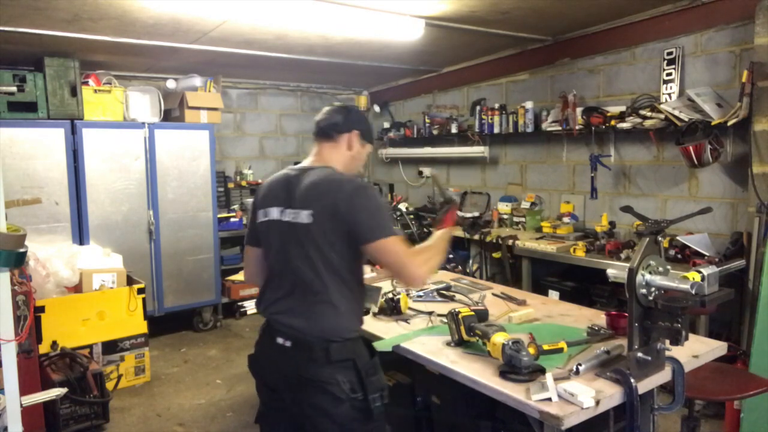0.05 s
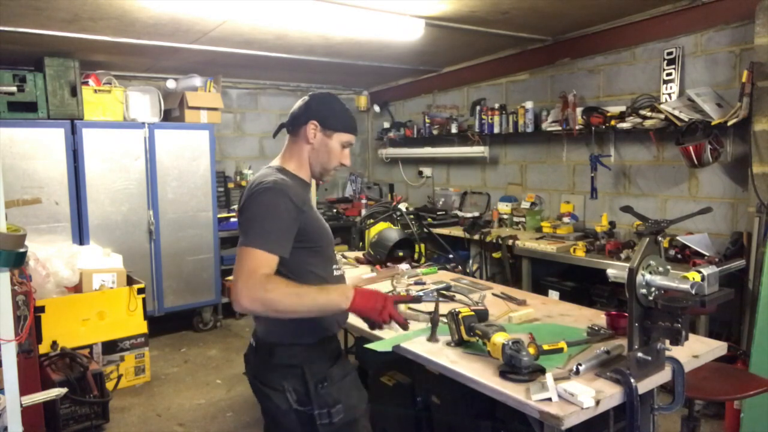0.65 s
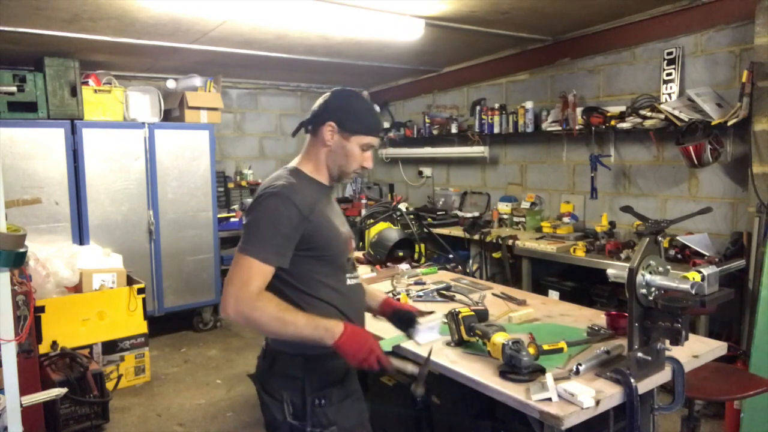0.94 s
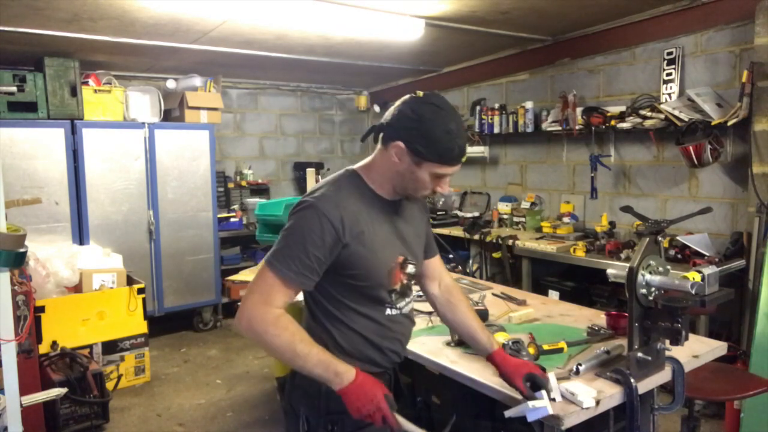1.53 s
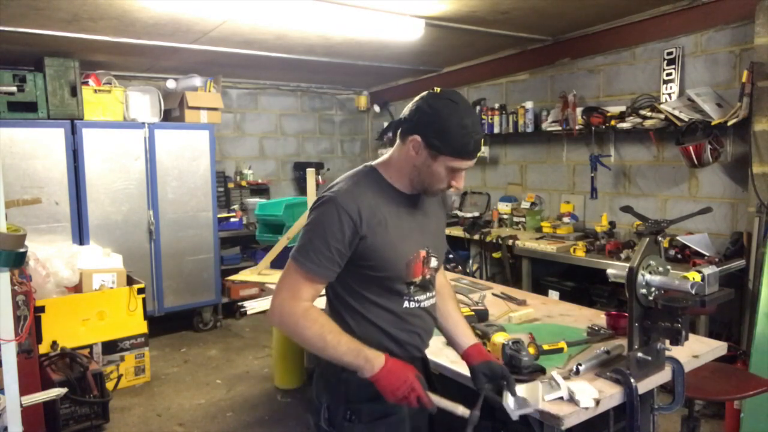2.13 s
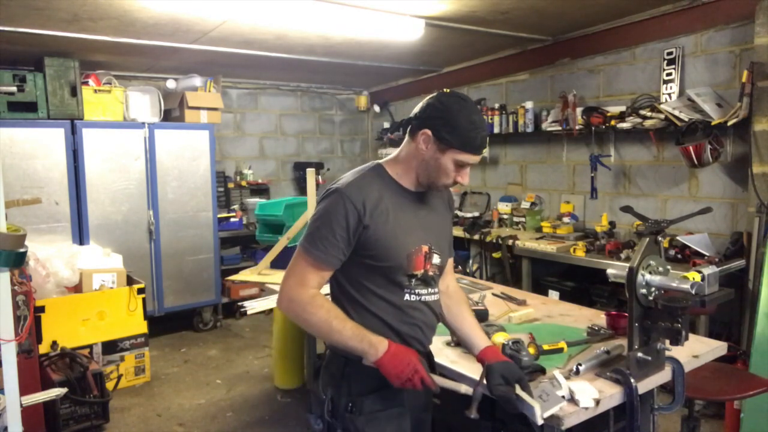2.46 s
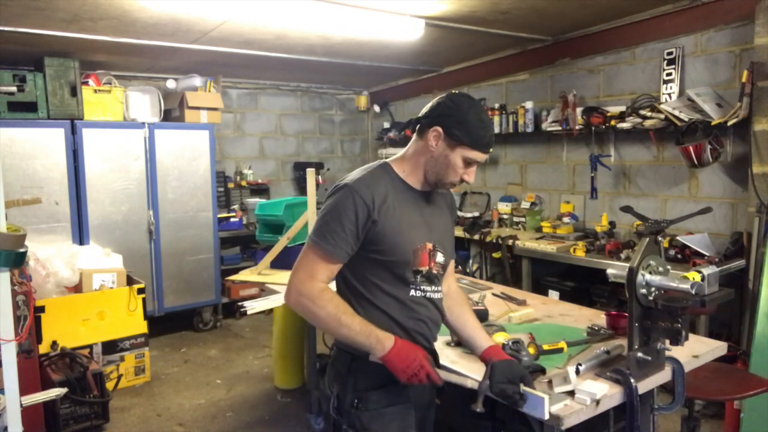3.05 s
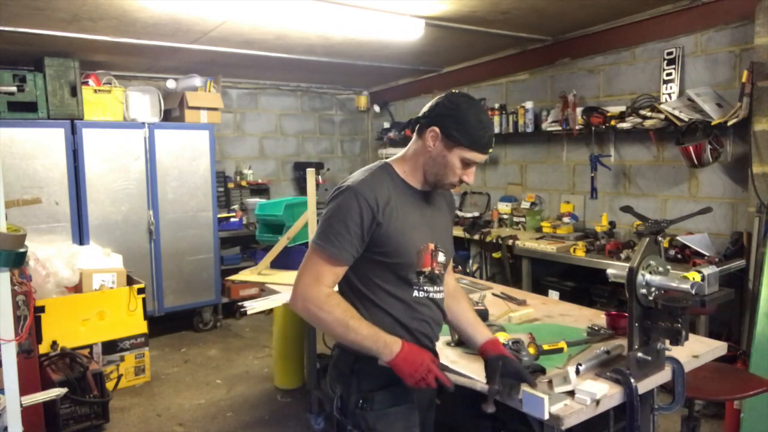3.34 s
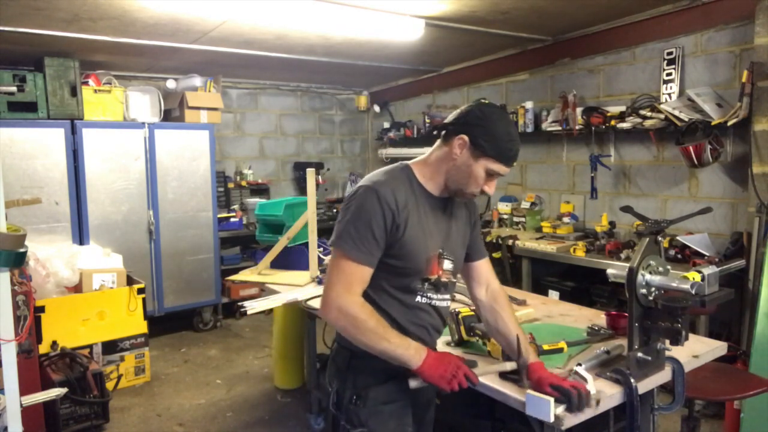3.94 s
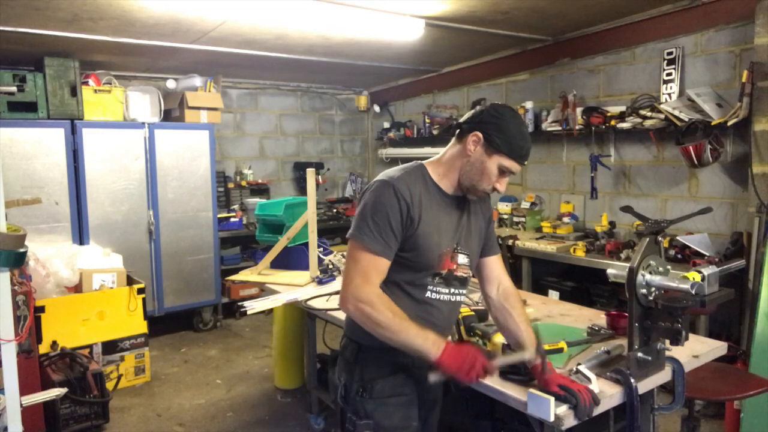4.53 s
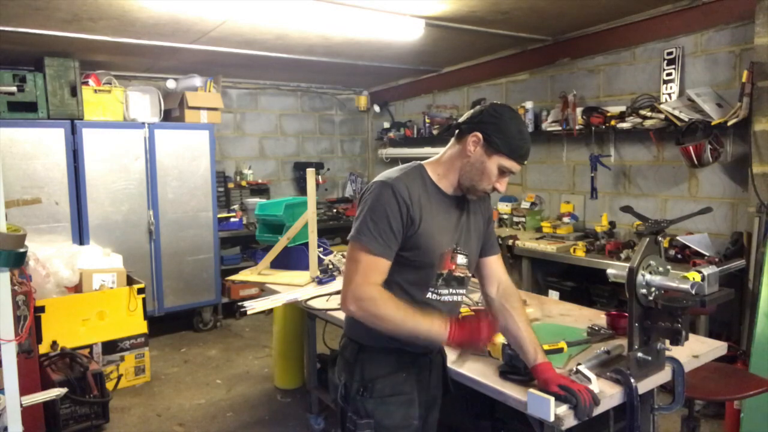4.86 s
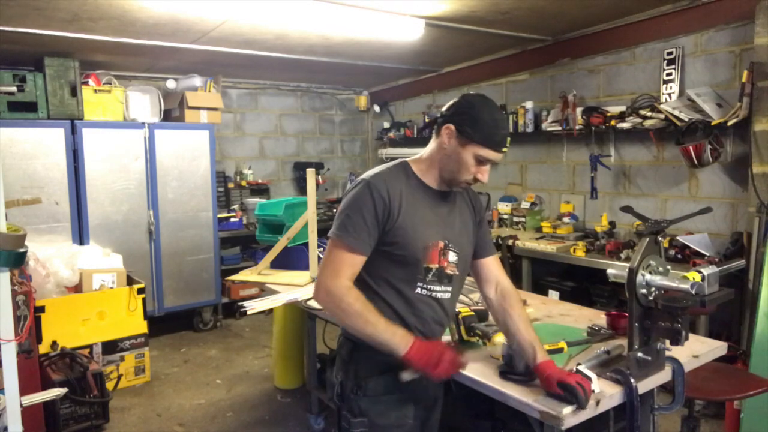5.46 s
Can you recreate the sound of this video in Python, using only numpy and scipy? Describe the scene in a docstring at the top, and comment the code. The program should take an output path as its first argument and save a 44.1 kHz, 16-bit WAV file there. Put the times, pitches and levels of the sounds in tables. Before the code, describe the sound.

A faint low room rumble runs throughout in a hard-walled garage with a short echo, heard on one microphone. At about 0.3 seconds a wooden piece knocks lightly on a workbench. From 1.4 to 3 seconds it is slid and nudged, giving quiet rubs, short rasps and scattered knocks that sound roomy rather than close. A brief, hoarse squeak of wood comes at 3.7 seconds, then more knocks around 4. A steel hammer clacks against the wood at 4.2 with a thin ring. At 4.5 and 4.95 seconds two heavy blows land, by far the loudest sounds: sharp wooden cracks that overload the microphone, with a short boom from the bench, the second stronger. After each, loose things drop back, grit skitters and steel tools jingle faintly. The hammer comes to rest with two light taps at about 5.4 and 5.6 seconds, the last one softer.

```python
"""A hammer strikes a glued wooden test piece on a workbench, on one microphone in a block-walled garage.
First the piece is slid and nudged into place: wood rubs, knocks and judders, with more room than direct
sound. The hammer clatters against it, lands twice so hard that the bench booms and the microphone
overloads, and comes to rest with two light taps. Loose tools and grit rattle after the blows,
over a low room tone."""
import sys
import numpy as np
from scipy import signal
from scipy.fft import rfft, irfft, next_fast_len
from scipy.io import wavfile

SR = 44100
rng = np.random.default_rng(int(sys.argv[2]) if len(sys.argv) > 2 else 0)


def wav_record(signal):
    """Record a signal, one row per channel, as 16-bit PCM in the file named by sys.argv[1]."""
    frames = np.transpose(np.atleast_2d(signal))
    bounded = np.clip(frames, -1, 1)
    # unit amplitude maps onto the largest positive 16-bit level
    quanta = np.round(bounded * 32767).astype(np.int16)
    wavfile.write(sys.argv[1], SR, quanta)


N = 246519
T = np.arange(SR * 6 // 10) / SR  # seconds into one short sound

# Heavy hammer blows, each throwing loose things into the air:
# start_s, level_db, tilt_db_per_octave, loss_per_slap_db, boom_db, flight_s, landing_db
BLOWS = [(4.5008, 12, -3.5, 6.5, -13, .139, -29), (4.951, 13, -.3, 2.8, -7.5, .166, -14.5)]
# The piece put down and nudged: start_s, level_db, tilt_db_per_octave, corner_share
KNOCKS = [(.297, -39, 9, .1), (.333, -24.5, 6.5, .05), (.864, -42.5, 4, .2), (1.449, -28, -3.5, 0),
          (1.483, -27, 3.5, .2), (1.552, -33, -2, 0), (2.309, -38, -4, .35), (2.379, -40, 0, .4),
          (2.43, -35.5, -3, .1), (2.511, -27.5, -4, .3), (2.607, -32, 1, .55), (2.68, -31, -2.5, 0),
          (2.937, -28, -5, .1), (3.777, -25.5, -3, .1), (3.989, -20.5, 3, .75), (4.008, -23, -9, 0),
          (4.047, -25, 8, 0), (4.4456, -23, 3, .3), (4.929, -31, 6, .9)]
# Resonances of the piece lying free: centre_hz, width_hz, lift_db
FREE_RESONANCES = [(637, 120, 6.5), (837, 23, 9.7), (1036, 50, 3.7), (1274, 61, 5), (1563, 90, 1),
                   (2535, 150, 2), (3860, 260, 11), (5390, 82, 5.3), (6650, 200, 11), (9130, 200, 5.7)]


def hammer_blows():
    """The hammer lands: the wood cracks, slaps the bench ever weaker and duller, buzzes and rings."""
    # Spectrum of the crack: frequency_hz, level_db
    colour = [(25, -45), (60, -18), (120, -8.5), (240, -6.5), (400, -3), (600, -2.5), (950, -6), (1300, -4),
              (2100, -3), (3000, -10), (4200, -8), (6500, -16), (10000, -26), (15500, -30.5)]
    # Resonances of the piece pressed hard onto the bench: centre_hz, width_hz, lift_db
    pressed = [(335, 25, 5), (402, 25, 5), (590, 50, 5), (812, 40, 7), (1000, 30, 4), (1182, 30, 4),
               (1305, 50, 5), (1680, 100, 4), (1992, 35, 4), (2092, 35, 4), (2305, 50, 6), (2890, 30, 5)]
    # Modes of the piece on the bench top: pitch_hz, level_db, t60_s
    wood_modes = [(215, 1, .2), (262, 1, .2), (335, 4, .25), (402, 3, .25), (583, 3, .33), (636, -1, .25),
                  (810, 0, .25), (1181, -8, .45), (1303, -2, .3), (1648, -5, .3), (1813, -7, .3),
                  (1995, -7, .3), (2310, -5, .3), (3190, -18, .4), (4210, -17, .5), (4520, -17, .42)]
    slap_gap_s, dulling_db_per_octave = .009, 1
    out = np.zeros(N)
    for start_s, blow_db, tilt, loss_db, *_ in BLOWS:
        for slap in range(3):
            s, db = start_s + slap * slap_gap_s, blow_db - slap * loss_db
            click = contact(colour, tilt - slap * dulling_db_per_octave, pressed)
            crack = chatter(click, db=3.5, t60=.043)
            add(out, s, amp(db) * garage(crack, wet_db=-5.5, build_s=.0018))
            add(out, s, amp(db - 38) * ring(wood_modes, blur_hz=5.5))
    return out


def bench_boom():
    """Under a blow or nudge the heavy top swells into a short boom, then hums on in its lowest modes."""
    # Modes of the bench top: pitch_hz, level_db, t60_s
    modes = [(78, -12.5, 0.33), (119, -3, 0.36), (140.2, 1, 0.56)]
    give_s = .0045  # the top gives way just after the contact
    swell = np.exp(-((T - .039) / .02) ** 2) + .3 * np.exp(-((T - .008) / .007) ** 2)
    boom = np.zeros(len(T))
    for hz, db, t60 in modes:
        hum = amp(-5 - 60 * T / t60)
        boom += amp(db - 9.5) * (swell + hum) * np.cos(2 * np.pi * hz * (T - .042))
    boom *= 1 - np.exp(-T / .002)
    out = np.zeros(N)
    for s, _, _, _, boom_db, _, _ in BLOWS:
        add(out, s + give_s, amp(boom_db) * boom)
    for s, db, tilt, _ in KNOCKS:
        add(out, s + give_s, amp(db - 21 - .8 * tilt) * boom)  # dull, flat contacts move it most
    return out


def hammer_taps():
    """The steel head touches the wood: a dry clack and a thin ring, stronger the harder the contact."""
    # Light hammer contacts: start_s, level_db, tilt_db_per_octave
    taps = [(4.2250, -8, 4.5), (4.2298, -2, .5), (5.3981, -6.5, -1.5), (5.5679, -18.5, -4.5)]
    # Spectrum of the clack: frequency_hz, level_db
    colour = [(30, -43.5), (110, -20), (220, -8), (480, -3), (1000, 0), (1700, 2.5), (2500, -3),
              (3500, -21), (6000, -17), (10000, -30), (15500, -34)]
    # Modes of the steel head: pitch_hz, level_db, t60_s
    head_modes = [(2649, -9, 0.063), (4380, -19.5, .14), (4570, -3, .12), (5809, -2, .15),
                  (6080, -1.5, .13), (7190, -6, 0.099), (9087, -9.5, .1)]
    out = np.zeros(N)
    for s, db, tilt in taps:
        clack = chatter(contact(colour, tilt), db=-4.5, t60=.025)
        add(out, s, amp(db) * garage(clack, wet_db=-7, build_s=.002))
        steel = garage(ring(head_modes, blur_hz=110), wet_db=-5.5, build_s=.0023)
        add(out, s, amp(db - 31 + 2.3 * tilt) * steel)
    return out


def knocks():
    """The piece and loose things land on the bench, heard mostly off the walls; a corner adds a clack."""
    # Spectrum of wood on wood: frequency_hz, level_db
    colour = [(30, -34), (100, -6), (220, 1), (420, -3), (700, -2), (1300, 0.5), (2200, -8.5),
              (3500, -20.5), (6500, -24), (10000, -32.5), (15500, -37)]
    # Modes of a hard corner: pitch_hz, level_db, t60_s
    corner_modes = [(2555, -1.5, 0.029), (2854, -3, 0.03), (4160, -16.5, 0.039), (5520, -10.5, 0.027),
                    (6200, -17.5, .035), (9140, -23.5, .03)]
    landing_tilt, landing_corner = 2, .25
    falls = [(s, db, landing_tilt, landing_corner) for s, db in landings()]
    out = np.zeros(N)
    for s, db, tilt, corner_share in KNOCKS + falls:
        knock = chatter(contact(colour, tilt, FREE_RESONANCES), db=3, t60=.033)
        clack = corner_share * amp(-4) * ring(corner_modes, blur_hz=60)
        add(out, s, amp(db - 3) * garage(knock + clack, wet_db=4, build_s=.0024))
    return out


def loose_tools():
    """Loose steel is jolted and jingles in a few high modes."""
    # Jolts of the tools: start_s, level_db
    jingles = [(3.823, -50), (4.64, -40), (5.116, -35.5), (5.568, -39)]
    # Modes of the tools: pitch_hz, level_db, t60_s
    modes = [(4030, 0, 0.15), (4200, -3, 0.36), (4520, -16, 0.17), (5900, -19.5, 0.31), (7250, -23.5, 0.29),
             (8950, -18, 0.32)]
    out = np.zeros(N)
    for s, db in jingles:
        add(out, s, amp(db - 8) * garage(ring(modes, blur_hz=39.6), wet_db=.5, build_s=.0073))
    return out


def grit():
    """Tiny hard bits bounce in quickly fading sprays of bright ticks."""
    # Grit skittering over the bench: start_s, level_db
    sprays = [(2.34, -44), (2.68, -38), (2.926, -28), (3.777, -40), (4.048, -43), (4.538, -11.5),
              (5.289, -44)]
    tick_colour = [(1000, -37), (4500, -4.5), (9000, -.5), (10500, -7.5), (13000, 1), (15500, -14)]
    tick = contact(tick_colour, tilt=0)
    bounces_per_s, t60 = 500, .09
    out = np.zeros(N)
    for s, db in sprays + [(s, db - 11) for s, db in landings()]:
        hits = rng.random(len(T)) < bounces_per_s / SR
        bounces = hits * rng.standard_normal(len(T)) * amp(-60 * T / t60)
        spray = signal.fftconvolve(bounces / np.linalg.norm(bounces), tick)[:len(T)]
        add(out, s, amp(db) * garage(spray, wet_db=1.5, build_s=.005))
    return out


def slides():
    """The grain catches and slips hundreds of times a second: the flat rubs and hisses, an edge rasps."""
    # Pushes that slide the piece: start_s, rise_s, hold_s, level_db, edge_share
    pushes = [(.10, .03, .18, -64, .5), (1.465, .015, .065, -45.5, .3), (1.605, .025, .08, -46.5, .1),
              (1.70, .04, .015, -36.5, .03), (1.81, .02, .02, -51, .4), (1.87, .03, .02, -53.5, 0),
              (1.95, .025, .01, -41, .28), (2.805, .04, .075, -45.5, .9), (2.89, .04, .012, -39.5, .5),
              (3.80, .03, .02, -56, .7), (3.87, .03, .045, -51.5, 0), (4.05, .015, .015, -35.5, .12),
              (4.14, .03, .05, -51, 0), (5.24, .03, .09, -53.5, .5)]
    # Spectrum of the low rub: frequency_hz, level_db
    rub_colour = [(40, -29.5), (100, -12.5), (300, -5.5), (450, -4), (600, -1), (850, -2), (1200, 1.5),
                  (2000, -6.5), (2800, -26), (4000, -30.5), (8000, -60.5)]
    # Spectrum of the friction hiss: frequency_hz, level_db
    hiss_colour = [(1200, -31.5), (2300, -0.5), (3300, -4), (5500, -4), (10000, -16.5), (15500, -18)]
    # Resonances of a dragged edge: centre_hz, width_hz, lift_db
    edge_resonances = [(2400, 300, 15), (3070, 150, 5), (3630, 180, 2), (5400, 240, 14), (6700, 200, 10),
                       (9400, 300, 10)]
    slips_per_s = 700
    rub, hiss, rasp = np.zeros((3, N))
    for start_s, rise_s, hold_s, db, edge_share in pushes:
        gain = push(start_s, rise_s, hold_s, db)
        treble = gain * amp(-14.5 + 19 * edge_share)
        rub = np.hypot(rub, gain)  # overlapping pushes add in power
        hiss = np.hypot(hiss, (1 - edge_share) * treble)
        rasp = np.hypot(rasp, edge_share * treble)
    slips = (rng.random(N) < slips_per_s / SR) * rng.uniform(-1.34, 1, N)
    slips = garage(slips, wet_db=3, build_s=.0027)[:N]
    return (rub * coloured(slips, rub_colour, FREE_RESONANCES)
            + hiss * coloured(slips, hiss_colour)
            + rasp * coloured(slips, hiss_colour, edge_resonances))


def judder():
    """Under one hard shove the piece sticks and slips almost regularly: a short, hoarse squeak."""
    # Spectrum of the squeak: frequency_hz, level_db
    colour = [(100, -19), (450, -4.5), (750, -1), (1150, 2.5), (2100, -9), (2800, -18.5), (3800, -16.5),
              (5000, -25.5), (10000, -32.5), (15500, -42.5)]
    stick_slip_hz = 760
    cycles = np.cumsum(stick_slip_hz / SR + .022 * rng.standard_normal(N))
    slip_count = np.floor(np.maximum.accumulate(cycles))
    slips = np.diff(slip_count, prepend=0) * amp(2 * rng.standard_normal(N))
    squeak = garage(slips - slips.mean(), wet_db=1, build_s=.0035)[:N]
    return push(start_s=3.658, rise_s=.011, hold_s=.05, db=-31) * coloured(squeak, colour)


def garage(sound, wet_db, build_s):
    """The way to the microphone: direct, off the nearest surfaces, and as a tail built up in the clutter."""
    # Decay of the room: frequency_hz, t60_s
    decay = [(60, 0.71), (160, .43), (420, 0.36), (1100, 0.41), (2900, 0.37), (7700, 0.34), (15000, 0.22)]
    # First reflections: delay_s, level_db
    walls = [(.005, -13), (0.0137, -13), (0.0218, -13)]
    hz, t, noise = signal.stft(rng.standard_normal(len(T)), SR, nperseg=256)
    fade = amp(-60 * t / along(decay, hz)[:, None])
    tail = signal.istft(noise * fade, SR, nperseg=256)[1][:len(T)]
    tail *= 1 - np.exp(-T / build_s)
    response = amp(wet_db) * tail / np.linalg.norm(tail)
    response[0] += 1
    for delay_s, db in walls:
        response[round(delay_s * SR)] += amp(db)
    return signal.fftconvolve(sound, response)


def room_tone():
    """A low rumble and faint hiss fill the garage."""
    # Spectrum of the quiet room: frequency_hz, level_db
    colour = [(12, -57), (20, -27), (81, -1.5), (130, -16), (187, -11), (285, -13), (377, -15),
              (642, -18.5), (698, -19), (897, -18), (1120, -21.5), (1330, -22), (2390, -27), (7310, -33.5),
              (16000, -42.5)]
    return amp(-58.5) * coloured(rng.standard_normal(N), colour)


def landings():
    """What each blow throws up comes down one flight later: start_s, level_db."""
    return [(s + flight_s, db) for s, *_, flight_s, db in BLOWS]


def push(start_s, rise_s, hold_s, db):
    """Gain of one push: it gathers force, holds and dies away."""
    rise_db, fall_db_per_s = 14, 195
    t = np.arange(N) / SR - start_s
    swell_db = rise_db * np.minimum(t / rise_s - 1, 0)
    fade_db = fall_db_per_s * np.maximum(t - rise_s - hold_s, 0)
    return amp(db + swell_db - fade_db) * np.clip(2 * t / rise_s + 1, 0, 1)


def contact(colour, tilt, resonances=(), size=4096):
    """A click of peak 1; harder contacts tilt the treble up (dB per octave)."""
    hz = np.fft.rfftfreq(size, 1 / SR)
    db = along(colour, hz) + lift(resonances, hz) + tilt * np.log2(1 + hz / 1500)
    cepstrum = irfft(np.log(amp(db)))
    cepstrum[1:size // 2] *= 2  # minimum phase: nothing sounds before the hit
    cepstrum[size // 2 + 1:] = 0
    click = irfft(np.exp(rfft(cepstrum)))
    return np.pad(click / np.abs(click).max(), (0, len(T) - size))


def chatter(click, db, t60):
    """A click plus the buzz of the surfaces just after they meet."""
    buzz = rng.standard_normal(len(T)) * amp(-60 * T / t60)
    return click + amp(db) * signal.fftconvolve(click, buzz / np.linalg.norm(buzz))[:len(T)]


def ring(modes, blur_hz):
    """Damped modes, struck at new strengths each time; rattling contact blurs their lines."""
    hz, db, t60 = np.transpose(modes)[:, :, None]
    strength, phase = rng.standard_normal((2, len(modes), 1))
    walk = np.cumsum(rng.standard_normal((len(modes), len(T))), axis=1)
    drift = walk * np.sqrt(2 * np.pi * blur_hz / SR)
    envelope = amp(db + 2 * strength - 60 * T / t60)
    return np.sum(envelope * np.sin(2 * np.pi * (hz * T + phase) + drift), axis=0)


def coloured(x, colour, resonances=()):
    """x shaped by a spectrum and resonances, at rms 1."""
    shaped = filtered(x, lambda hz: amp(along(colour, hz) + lift(resonances, hz)))
    return shaped / np.sqrt(np.mean(shaped ** 2) + 1e-20)


def filtered(x, response):
    """x through a gain that depends on frequency."""
    size = next_fast_len(N + SR // 2)
    return irfft(rfft(x, size) * response(np.fft.rfftfreq(size, 1 / SR)), size)[:N]


def lift(resonances, hz):
    """dB added around each resonance."""
    return sum(db / (1 + (2 * (hz - centre) / width) ** 2) for centre, width, db in resonances)


def along(points, hz):
    """A curve through (Hz, value) points on a log axis."""
    frequencies, values = np.transpose(points)
    return np.interp(np.log(hz + 1), np.log(frequencies), values)


def amp(db):
    return 10 ** (np.asarray(db) / 20)


def add(track, s, sound):
    """Mix a sound into a track from time s on."""
    start = round(s * SR)
    track[start:start + len(sound)] += sound[:N - start]


def scene():
    """Everything that reaches the microphone, in mono."""
    hammering = hammer_blows() + bench_boom() + hammer_taps()
    return (hammering + knocks() + loose_tools() + grit() + slides() + judder() + room_tone())[None]


def record(dry):
    """The input clips on the heavy blows; the deepest bass and the top of the treble roll off."""
    bass_cut_hz, top_hz = 45, 16000
    clipped = dry[0] / (1 + np.abs(dry[0]) ** 8) ** (1 / 8)
    bass_cut = signal.butter(2, bass_cut_hz, "highpass", fs=SR, output="sos")
    thinned = signal.sosfilt(bass_cut, clipped)
    return filtered(thinned, lambda hz: 1 / (1 + (hz / top_hz) ** 120))[None]


dry = scene()
out = record(dry)
wav_record(out)
```